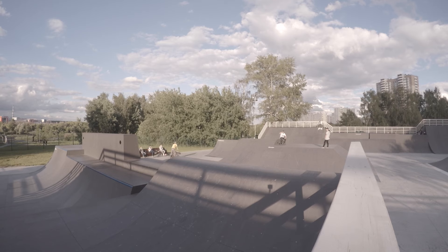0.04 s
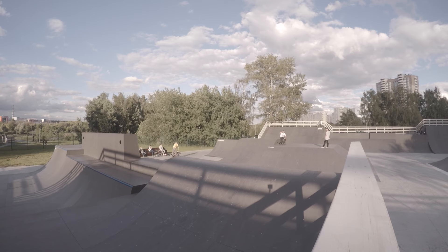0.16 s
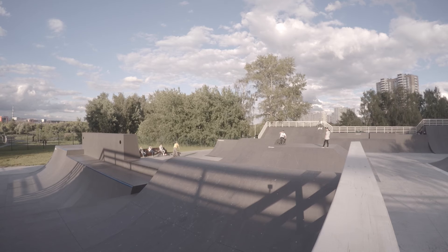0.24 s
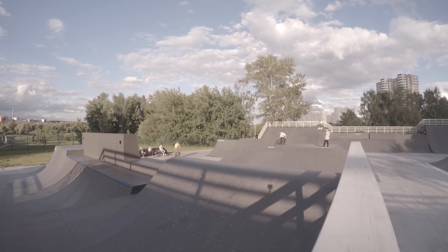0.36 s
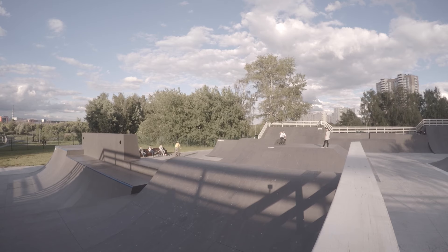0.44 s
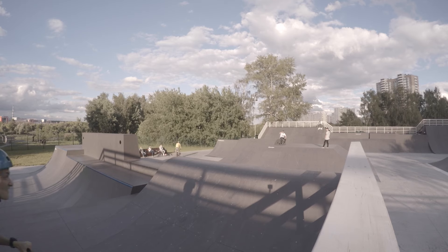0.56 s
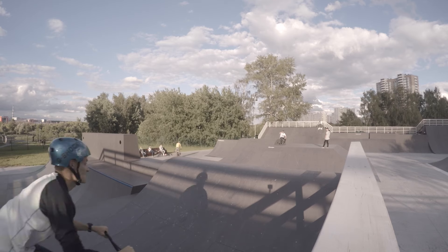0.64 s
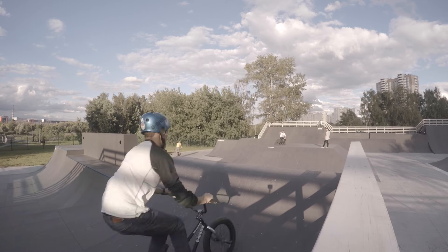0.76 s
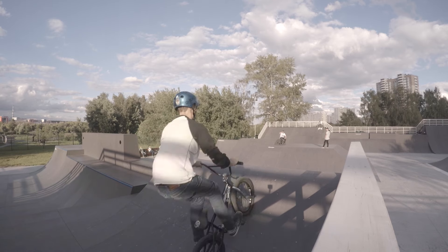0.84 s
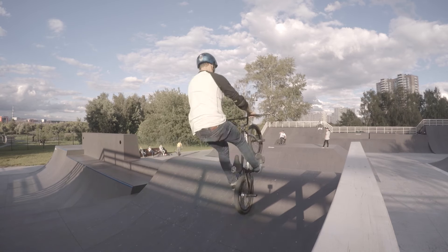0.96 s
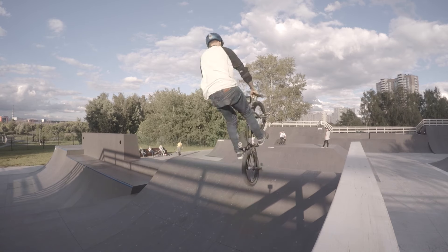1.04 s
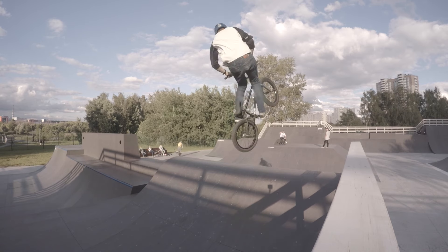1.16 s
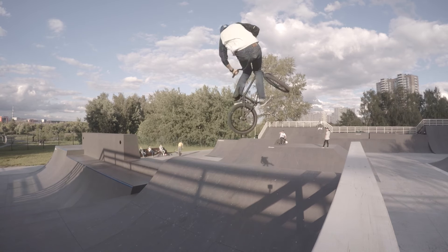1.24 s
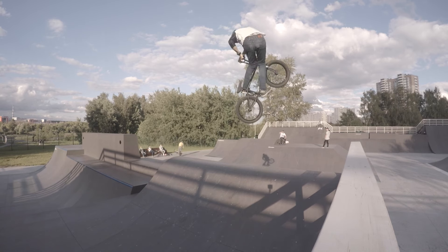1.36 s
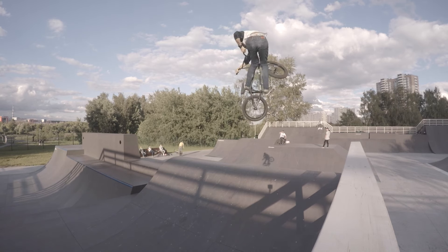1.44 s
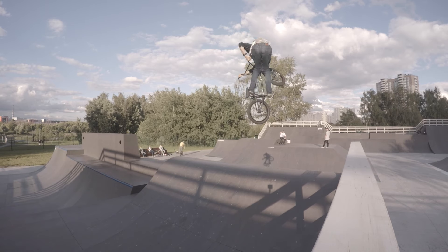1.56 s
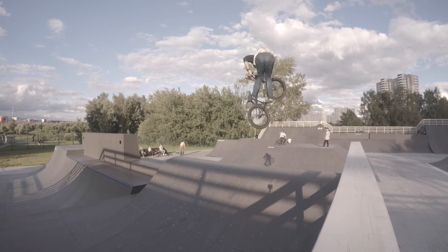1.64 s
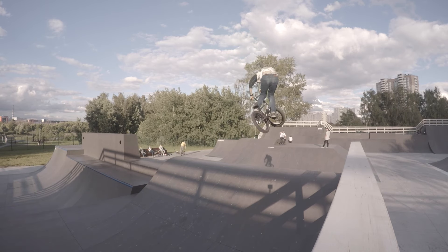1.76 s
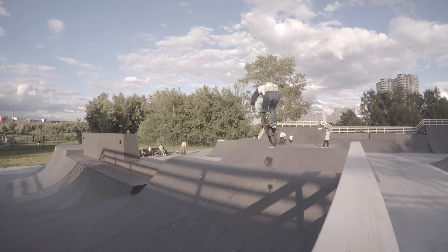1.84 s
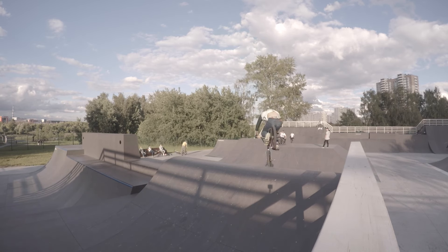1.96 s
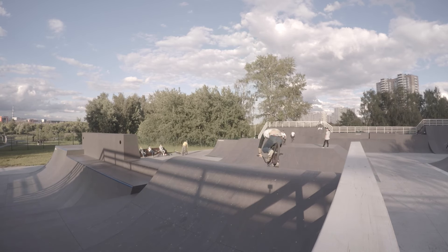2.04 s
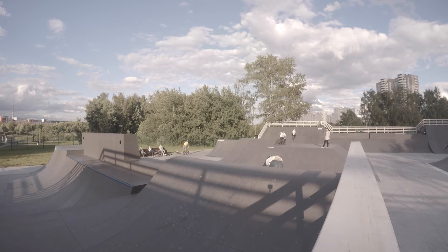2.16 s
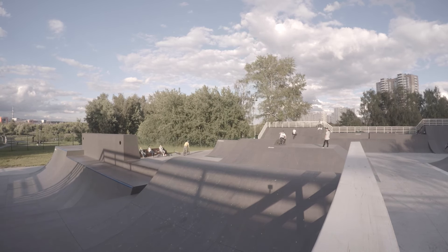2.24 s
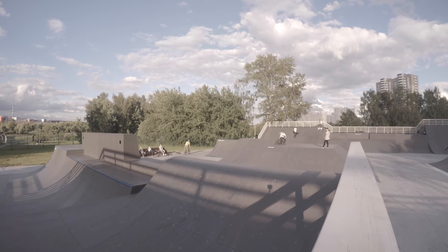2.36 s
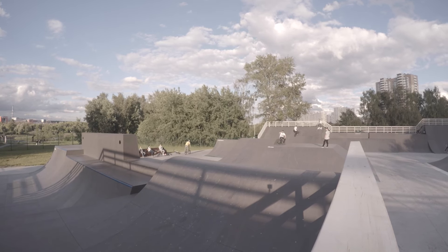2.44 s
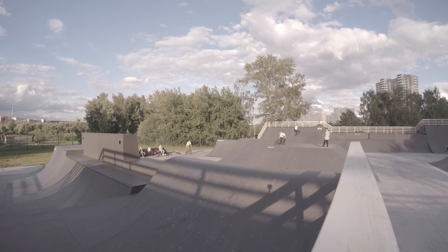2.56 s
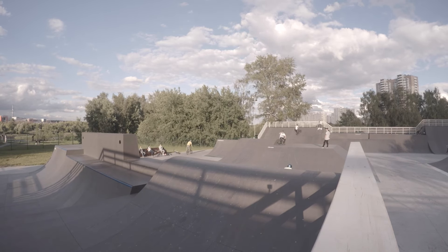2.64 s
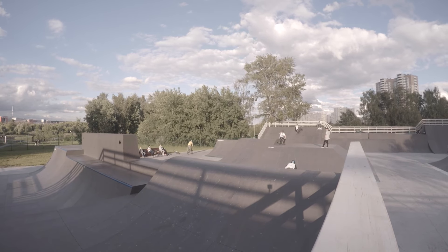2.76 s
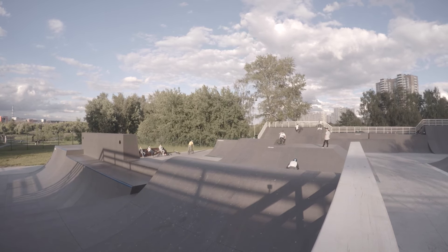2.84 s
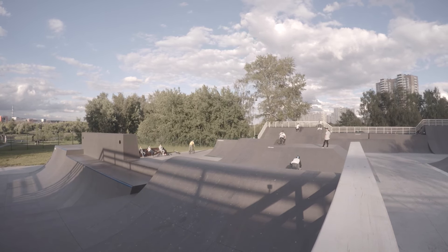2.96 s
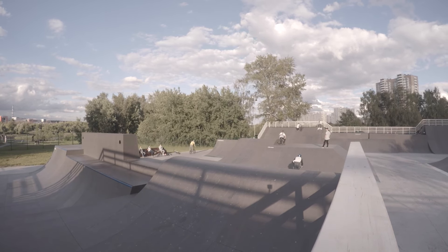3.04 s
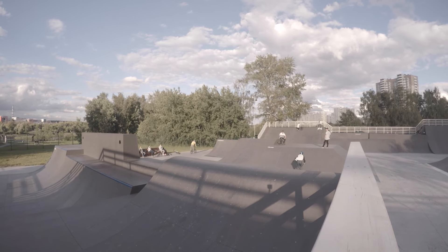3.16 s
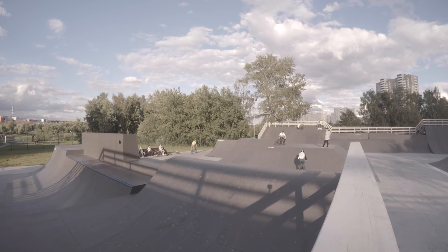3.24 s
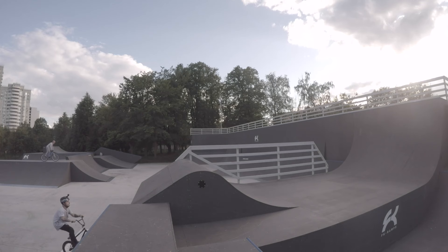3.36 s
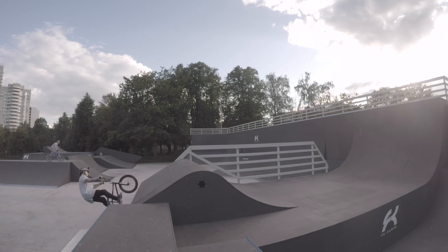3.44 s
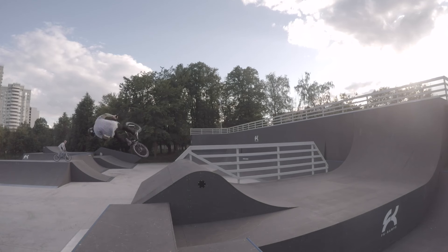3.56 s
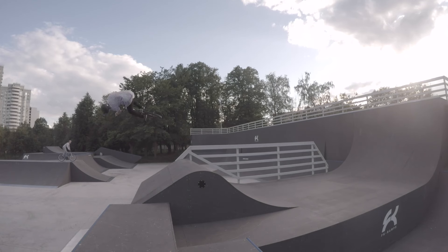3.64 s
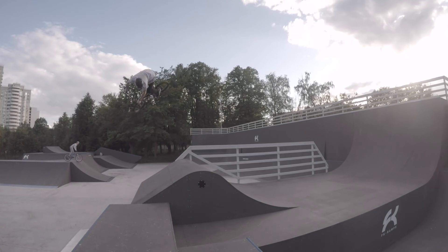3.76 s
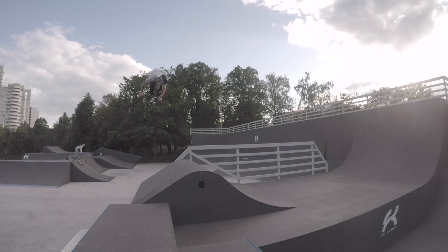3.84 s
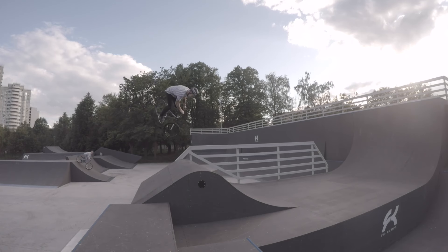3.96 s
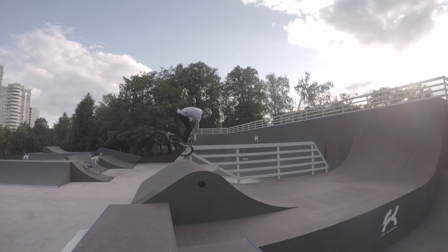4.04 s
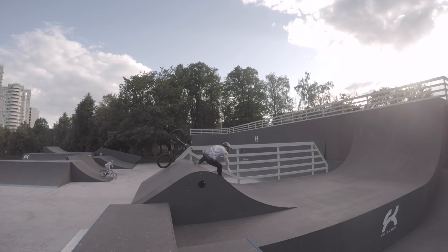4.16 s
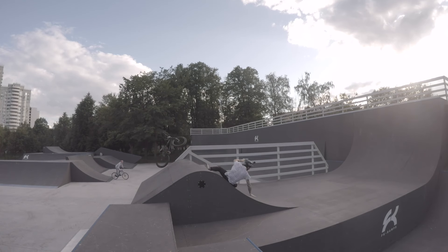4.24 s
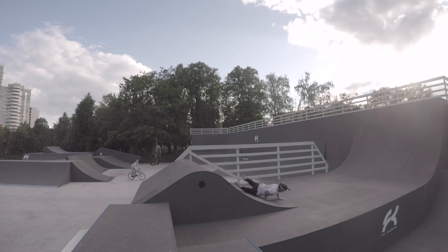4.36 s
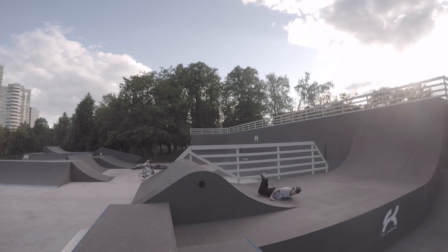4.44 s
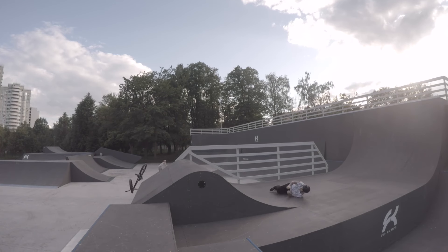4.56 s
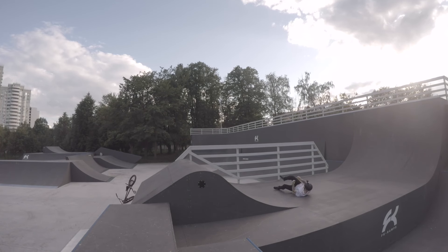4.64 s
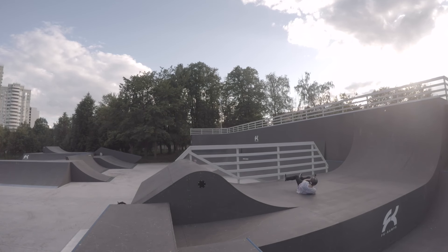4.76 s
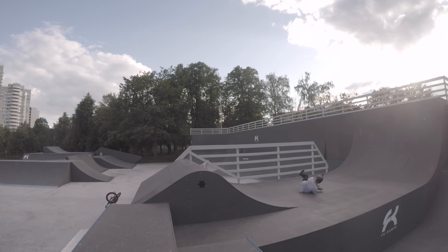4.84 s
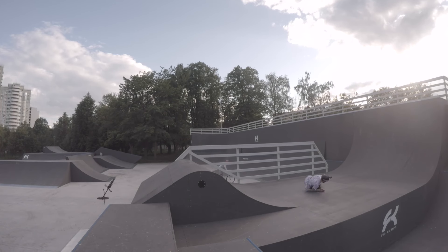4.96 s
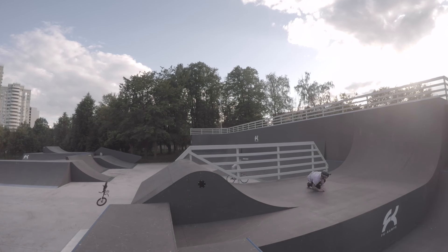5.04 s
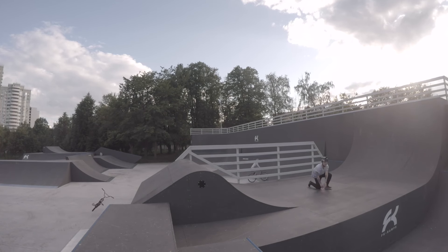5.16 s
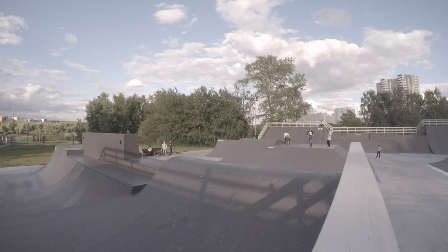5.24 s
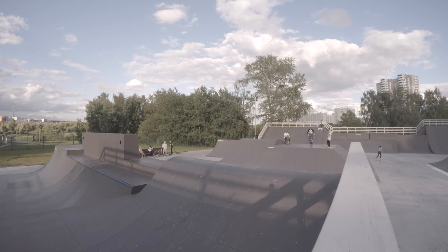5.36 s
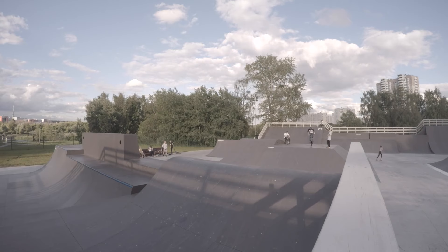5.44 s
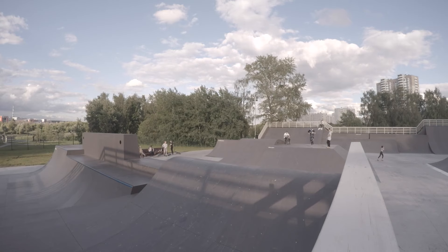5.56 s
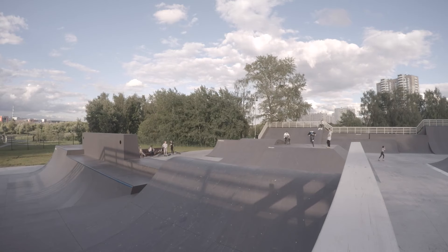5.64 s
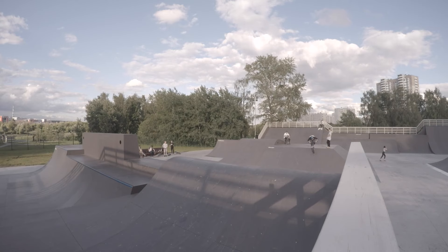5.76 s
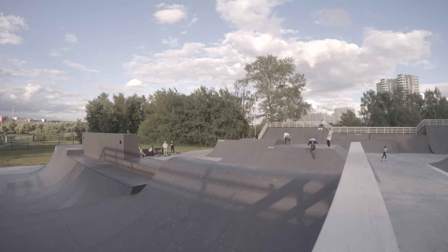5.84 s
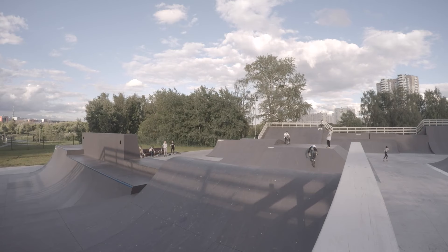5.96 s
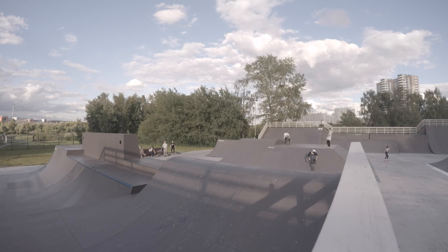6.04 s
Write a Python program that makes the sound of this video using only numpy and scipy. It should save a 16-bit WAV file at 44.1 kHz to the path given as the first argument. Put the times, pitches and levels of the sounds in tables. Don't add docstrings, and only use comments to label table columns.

```python
import sys
import numpy as np
from scipy import signal
from scipy.fft import rfft, irfft, next_fast_len
from scipy.io import wavfile
from scipy.ndimage import uniform_filter1d, map_coordinates

SR = 44100
rng = np.random.default_rng(int(sys.argv[2]) if len(sys.argv) > 2 else 0)


def persist_wave(psi):
    counts = np.round(np.clip(psi, -1, 1) * 32767).astype(np.int16)
    wavfile.write(sys.argv[1], SR, np.atleast_2d(counts).T)


def how_loud(loudness_db):
    steps = np.asarray(loudness_db, float) / 20
    return 10 ** steps


N = 269010

# (time [s], time [s])
SCENE_CHANGES = (3.437, 5.32)


def clock():
    return np.arange(N) / SR


def white():
    return rng.standard_normal(N)


def unit(x):
    return x / np.sqrt(np.mean(x ** 2) + 1e-20)


def curves(rows):
    s, *cols = np.transpose(rows)
    t = clock()
    gate = (t >= s[0]) * np.clip((s[-1] - t) / 0.0022, 0, 1)
    return [np.interp(t, s, c) for c in cols] + [gate]


def wobble(rate):
    knots = rng.standard_normal(int(N * rate / SR) + 4)
    return map_coordinates(knots, [np.arange(N) * rate / SR])


def swell(s, db, t60, rise):
    since = np.clip(clock() - s, 0, None)
    return how_loud(db - 60 * since / t60) * (1 - np.exp(-since / rise))


def touches(rows):
    t = clock()
    return sum(how_loud(db) * np.exp(-((t - s) / half) ** 2) for s, half, db in rows)


def filtered(x, response):
    m = next_fast_len(N + SR // 2)
    return irfft(rfft(x, m) * response(np.fft.rfftfreq(m, 1 / SR)), m)[:N]


def coloured(x, spectrum):
    f, db = np.transpose(spectrum)
    return unit(filtered(x, lambda hz: how_loud(np.interp(np.log(hz + 1), np.log(f + 1), db))))


def resonant(x, modes, steep=1.42):
    def response(f):
        g = 0
        for k, (c, w, db) in enumerate(modes):
            g = g + (-1) ** k * how_loud(db / steep) * 1j * f * w / (c * c - f * f + 1j * f * w)
        g = g * np.abs(g) ** (steep - 1)
        return g / np.sqrt(np.mean(np.abs(g) ** 2))
    return filtered(x, response)


def rush(spectrum, patchy_db, grain_db=0, grain_hz=300):
    z = signal.stft(white() * how_loud(grain_db * wobble(grain_hz)), nperseg=512)[2]
    field = uniform_filter1d(rng.standard_normal(z.shape), 6, 0)
    field = uniform_filter1d(field, 10, 1)
    patchy = signal.istft(z * how_loud(patchy_db * unit(field)), nperseg=512)[1][:N]
    return coloured(patchy, spectrum)


def bursts(times, db, t60, rise=0.0013):
    t = np.arange(SR // 8) / SR
    shape = how_loud(np.c_[db] - 60 * t / np.clip(np.c_[t60], .003, .2)) * (1 - np.exp(-t / rise))
    at = np.round(np.c_[times] * SR).astype(int) + np.arange(len(t))
    return np.bincount(at.ravel(), shape.ravel(), N + SR)[:N] * white()


def passing():
    # (time [s], level [dB])
    nearness = [(0.0, -54), (0.34, -47.5), (0.6, -44), (0.81, -39), (0.96, -40.5), (1.05, -48.5),
                (1.13, -61), (2.04, -66), (2.2, -65)]
    tyre_db, gate = curves(nearness)
    return gate * (tyres(tyre_db) + hub_buzz()) + tread_hum() + wheel_leaving()


def tyres(tyre_db):
    # (frequency [Hz], level [dB per Hz])
    deck_colour = [(88, -12), (150, 4), (216, 0.5), (315, -5.5), (450, -9), (631, -6), (710, -2.5),
                   (1600, -18), (2080, -19.5), (3520, -120)]
    # (frequency [Hz], level [dB per Hz])
    hiss_colour = [(760, -18), (1300, -30), (1460, -23), (2330, -1), (2690, -3.5), (3100, 3), (3510, -1.5),
                   (3900, 6.5), (4450, 1), (5200, -9), (5710, -14.5), (7000, -18), (9100, -52),
                   (15400, -120)]
    earlier_boom = how_loud(-32 - 60 * clock() / 1.17)
    deck = (how_loud(tyre_db + 4) + earlier_boom) * rush(deck_colour, patchy_db=-1.0)
    return deck + how_loud(tyre_db) * rush(hiss_colour, patchy_db=2.5, grain_db=1.0)


def hub_buzz():
    # (frequency [Hz], level [dB per Hz])
    beside = [(2940, -52), (5000, -9), (5930, -10), (6760, -19), (7600, 1), (8500, -0.5), (11500, -10),
              (12900, -5), (15200, -6), (16000, -12)]
    # (frequency [Hz], level [dB per Hz])
    arriving = [(2940, -36), (5000, -3.5), (7040, -4.5), (7560, -3), (8820, 2), (10200, -11), (14500, -7),
                (15800, -9)]
    # (frequency [Hz], level [dB per Hz])
    departing = [(3290, -30), (5600, 2), (5670, -12), (7230, -4), (7590, -6), (8170, -6), (15800, -15)]
    # (time [s], half length [s], level [dB])
    spring_rings = [
        (.36, .07, -8),
        (.45, .015, -10),
        (.95, .012, -5),
        (1.869, .04, -4),
    ]
    t = clock()
    takeoff_s, lift_s = 1, 0.12
    hub_db = -48.5 - 4.5 * t - 13.5 * np.clip((t - takeoff_s) / lift_s, 0, 1)
    teeth = np.cumsum(125 + 12 * wobble(12)) / SR % 1
    pawls = white() * (0.27 + np.exp(-teeth / 0.25)) * how_loud(0.8 * wobble(39.7))
    come, gone = ((1 + np.tanh((t - s) / .05)) / 2 for s in (0.2, 0.79))
    buzz = (come - gone) * coloured(pawls, beside)
    buzz += (1 - come) * how_loud(0.5) * coloured(pawls, arriving)
    buzz += gone * how_loud(0.5) * coloured(pawls, departing)
    buzz += how_loud(1.5 * wobble(5.5)) * touches(spring_rings) * resonant(white(), [(13000, 250, 0)])
    return how_loud(hub_db) * buzz


def tread_hum():
    # (time [s], knob rate [Hz], level [dB], overtone level [dB])
    knobs = [(.33, 250.5, -55, -55), (.4, 256.3, -42, -50), (.52, 244, -48, -49), (.62, 249.6, -57, -46),
             (.68, 258.6, -32, -47), (.718, 265, -38, -47), (.735, 305.6, -37, -56), (.82, 318, -39, -46),
             (.96, 331.5, -40, -47), (1.02, 332.4, -63, -62)]
    knob_hz, hum_db, over_db, _ = curves(knobs)
    turn = 2 * np.pi * np.cumsum(knob_hz * (1 + 0.0143 * wobble(40))) / SR
    second = how_loud(over_db + 2.5) + how_loud(-38 - 4000 * (clock() - .85) ** 2)
    hum = how_loud(hum_db + 1.7 * wobble(25.06)) * np.sin(turn) + second * np.sin(2 * turn)
    hum += how_loud(over_db - 0.5 + 2.9 * wobble(20.0)) * np.sin(3 * turn)
    return hum + how_loud(over_db - 7.5 + 2.7 * wobble(16)) * np.sin(4 * turn)


def wheel_leaving():
    # (frequency [Hz], width [Hz], level [dB])
    edge_modes = [(1930, 250, -4), (2580, 760, 0)]
    fade = how_loud(-47) / (1 + (clock() / 0.17) ** 6)
    return fade * unit(resonant(white(), edge_modes))


def freewheel():
    # (time [s], teeth passed [count])
    coasting = [(1.06, 0), (1.169, 3), (1.292, 8), (1.4404, 17), (1.5567, 23), (1.779, 39), (1.8939, 47),
                (2.05, 57)]
    # (level at take-off [dB], fade [dB per s], swing [dB], faces the microphone at [s])
    facing = [
        (-50, 7.5, 3, 1.285),
        (-55.5, 6, 2, 1.47),
        (-45.5, 9, -1.5, 1.45),
    ]
    # (frequency [Hz], width [Hz], level [dB])
    pawl_modes = [(7500, 710, 3), (10200, 1100, -3)]
    # (frequency [Hz], width [Hz], level [dB])
    spring_modes = [(12500, 770, 2), (13700, 700, -8)]
    # (frequency [Hz], width [Hz], level [dB])
    shell_modes = [(2400, 400, -6), (3250, 300, 0.5), (3680, 320, 4), (4490, 160, 8), (5250, 440, -3)]
    turn_s = 0.49
    when, teeth = np.transpose(coasting)
    s = np.interp(np.arange(teeth[-1] + 1), teeth, when)
    luck = rng.standard_normal((len(s), 4))
    s = s + 0.00077 * luck[:, 0]
    levels = []
    for k, (db, fade_db, swing_db, at) in enumerate(facing):
        swing = swing_db * np.cos(2 * np.pi * (s - at) / turn_s)
        levels.append(db - fade_db * (s - s[0]) + swing + 2.0 * luck[:, k + 1])
    pawl_db, spring_db, shell_db = levels
    pawl = resonant(bursts(s, pawl_db - 0.5, 0.013 + 0 * s, rise=0.00033), pawl_modes)
    spring = resonant(bursts(s, spring_db + 1, 0.011 + 0 * s, rise=.0003), spring_modes)
    shell = resonant(bursts(s + 0.0009, shell_db + 2, 0.022 + 0 * s, rise=0.00078), shell_modes, steep=1.5)
    return pawl + spring + shell


def chain():
    # (time [s], peak level [dB], link level [dB])
    slaps = [(2.2326, -33, -16), (2.2482, -19, -14.5), (2.2608, -23, -26), (2.271, -14, -20),
             (2.2748, -16, -26), (2.2815, -10.5, -27), (2.2965, -23.5, -23), (2.309, -28, -15),
             (2.331, -29, -20), (2.337, -31, -21), (2.3455, -28, -20), (2.3614, -45, -13),
             (2.378, -34, -11), (2.3873, -33, -17), (2.39, -25, -20), (2.4135, -30, -14),
             (2.4214, -36, -14), (2.4314, -37, -12), (2.441, -31.5, -12), (2.462, -31, -12),
             (2.475, -34, -15), (2.4833, -28, -18), (2.51, -32.5, -14), (2.522, -31, -16),
             (2.5526, -30, -16), (2.569, -33, -16), (2.593, -34, -13), (2.6044, -36.5, -13.5),
             (2.6314, -33, -14), (2.6525, -35.5, -16), (2.6748, -42, -13), (2.684, -34, -15),
             (2.693, -41, -12), (2.7212, -34, -18), (2.756, -36.5, -16), (2.7654, -40, -16),
             (2.795, -34, -16), (2.8379, -44, -10), (2.8499, -42, -10), (2.8858, -40, -16),
             (2.917, -47, -9)]
    # (time [s], level [dB], t60 [s])
    rattle = [
        (2.255, -30, .2),
        (2.38, -48, 1.1),
    ]
    # (frequency [Hz], width [Hz], level [dB])
    stay_modes = [(904, 616, 5), (1430, 820, 4.5), (1880, 530, 5.5), (2376, 850, -1), (2750, 430, -0.5)]
    # (frequency [Hz], width [Hz], level [dB])
    link_modes = [(3560, 380, 0), (4770, 680, 6.5), (6450, 500, -1.5), (7200, 250, -2)]
    s, db, link_db = np.transpose(slaps)
    t60 = 0.036 * how_loud(1.5 * rng.standard_normal(len(s)))
    clusters = how_loud(2.5 * wobble(250))
    stay = resonant(clusters * bursts(s, db - 0.5, t60, rise=0.0015), stay_modes, steep=1.43)
    links = resonant(clusters * bursts(s, db + link_db - 1.5, t60 * 0.9, rise=0.002), link_modes, steep=2.2)
    chatter = sum(swell(*row, rise=.015) for row in rattle) * how_loud(4.5 * wobble(120)) * white()
    stay += resonant(chatter, stay_modes, steep=1.43)
    return stay + links + how_loud(-15) * resonant(chatter, link_modes, steep=1.6)


def ramp():
    # (time [s], load [dB])
    load = [(3.44, -29), (3.57, -30), (3.79, -25.5), (4.146, -30.5), (4.23, -32), (4.702, -26.5),
            (5.14, -27.5), (5.32, -27.5)]
    # (frequency [Hz], level [dB per Hz])
    rumble_colour = [(88, -5.5), (150, -8), (326, -5), (404, -4.5), (515, -6.5), (609, -2), (742, -8),
                     (814, -2), (1400, -22), (1820, -66), (3080, -120)]
    # (frequency [Hz], level [dB per Hz])
    scrape_colour = [(650, -12), (1100, 1), (1360, -22), (1470, -1), (1560, -5), (1980, -9.5),
                     (3400, -33.5), (4420, -53), (7480, -120)]
    # (frequency [Hz], level [dB per Hz])
    grit_colour = [(1650, -7), (2800, -1), (3570, -7), (3890, -1.5), (4180, -4), (5370, -8), (11200, -30.5),
                   (12600, -23), (15500, -29)]
    # (time [s], half length [s], level [dB])
    slides = [(3.618, 0.33, -58.5), (4.224, 0.18, -56), (4.925, 0.04, -49), (4.99, .025, -56),
              (4.865, .012, -50), (4.44, .03, -58), (4.6, .04, -60), (5.075, 0.073, -65)]
    # (time [s], level [dB], t60 [s])
    slam = (4.163, -13, 0.1)
    load_db, gate = curves(load)
    judder = wobble(35)
    shaking = how_loud(load_db + 0.2 * judder) + swell(*slam, rise=0.0037)
    rumble = shaking * rush(rumble_colour, patchy_db=2.0, grain_db=0.87, grain_hz=125.3)
    scrape_db = -49.5 + 1.95 * (load_db + 30.5)
    scrape = how_loud(scrape_db + 0.79 * judder) * rush(scrape_colour, patchy_db=0.5, grain_db=2.5)
    grit = (how_loud(-65.5) + touches(slides)) * how_loud(0.33 * judder)
    return gate * (rumble + scrape + grit * rush(grit_colour, patchy_db=0.8, grain_db=2.5))


def knocks():
    # (time [s], panel level [dB], frame level [dB], pedal level [dB])
    close_blows = [(3.437, -17.5, -45, -45), (4.145, -24, -42, -40), (4.149, -22, -40, -38),
                   (4.153, -24, -42, -40), (4.162, -22, -16.5, -28), (4.166, 2, -16.5, -31),
                   (4.196, -24, -40, -53), (4.226, -25, -47, -47), (4.248, -29, -44, -54),
                   (4.301, -27, -36, -49), (4.325, -32, -37, -47), (4.411, -11, -35, -31),
                   (4.49, -14, -41, -64), (4.532, -28, -43, -55), (4.546, -27, -42, -52),
                   (4.569, -23, -33, -58), (4.578, -10.5, -38, -26.5), (4.589, -3.5, -25.5, -48),
                   (4.624, -13, -30.5, -49), (4.809, -27, -42, -52), (4.813, -14.5, -24, -36),
                   (4.818, -33, -24, -29), (4.822, -20, -28, -23), (4.827, -10, -26, -22),
                   (4.833, -16, -28, -34), (4.859, -14, -27, -40), (4.885, -30, -38, -46),
                   (4.905, -31, -40, -48), (5.215, -26, -48, -50), (5.236, -38, -42, -41),
                   (5.285, -18, -32, -43), (5.302, -26, -46, -46), (5.31, -28, -48, -47),
                   (5.316, -28, -46, -46)]
    # (time [s], panel level [dB], frame level [dB], coping level [dB])
    far_blows = [(3.265, -25, -39, -39.5), (3.284, -21, -49, -49), (3.31, -27, -54, -50),
                 (3.364, -20, -37.5, -36.5), (3.372, -32, -47, -50), (3.385, -21, -46, -49),
                 (3.409, -22, -50, -46), (3.439, -28, -50, -42), (3.454, -15.5, -53, -38)]
    # (time [s], level [dB])
    steel_cracks = [(4.162, -42), (4.166, -35), (4.302, -48), (4.412, -46), (4.812, -56), (4.823, -42),
                    (5.284, -52)]
    # (frequency [Hz], width [Hz], level [dB])
    panel_modes = [(300, 234, 0.5), (496, 140, 4), (800, 207, 1), (1074, 276, -5.5)]
    # (frequency [Hz], width [Hz], level [dB])
    frame_modes = [(1330, 310, -3), (1940, 350, -1), (2320, 170, 2), (2950, 780, -9)]
    # (frequency [Hz], width [Hz], level [dB])
    pedal_modes = [(3700, 1180, 2), (4520, 1010, 0.5), (5270, 290, -4)]
    # (frequency [Hz], width [Hz], level [dB])
    coping_modes = [(4270, 590, 0.5), (5510, 480, -3)]
    # (frequency [Hz], width [Hz], level [dB])
    crack_modes = [(7100, 2600, 6), (12200, 4600, -21)]
    s, panel_db, frame_db, high_db = np.transpose(close_blows + far_blows)
    ring_s, near = 0.023, len(close_blows)
    t60 = ring_s + 0 * s

    def ping(k, modes):
        return resonant(bursts(s[k], high_db[k] + 5.0, t60[k] * 0.55, rise=0.00065), modes, steep=1.45)

    wood = resonant(bursts(s, panel_db - 3.0, t60 * 1.24, rise=0.0014), panel_modes)
    steel = resonant(bursts(s, frame_db + 2.5, t60), frame_modes, steep=1.0)
    steel = steel + ping(slice(near), pedal_modes) + ping(slice(near, None), coping_modes)
    at, crack_db = np.transpose(steel_cracks)
    at, crack_db = np.r_[s, at], np.r_[(frame_db + high_db) / 2 - 37, crack_db]
    return wood + steel + resonant(bursts(at, crack_db + 1.0, ring_s * 0.57 + 0 * at, rise=.0002), crack_modes)


def thuds():
    # (time [s], level [dB], frequency [Hz], t60 [s])
    ringing_blows = [(2.23, -10, 95.3, 0.06), (2.475, -7, 50, 0.15), (3.266, -28, 290, 0.22),
                     (3.366, -31.5, 300, 0.34), (3.494, -8.5, 47, 0.18), (3.776, -12, 800, 0.021),
                     (3.805, -11, 700, 0.025), (3.846, -10.5, 810, 0.025), (3.884, -17, 854, 0.031),
                     (4.171, -2.5, 110.7, 0.055), (4.172, -8, 805, 0.035), (4.193, -1, 58, 0.074),
                     (4.304, -10, 68.6, 0.078), (4.33, -3, 111, 0.049), (4.418, -5, 78.6, 0.12),
                     (2.236, -15, 149, 0.27), (2.55, -27.5, 171, .3), (1.447, -45, 2035, 0.023),
                     (1.86, -48, 2296, 0.032), (1.885, -47, 2500, .03), (2.045, -51, 2400, 0.045),
                     (2.147, -57, 3680, .05), (4.427, -0.5, 33.5, 0.17), (4.491, -17, 840, .025),
                     (4.492, -21.5, 1430, 0.017), (4.553, -29, 1380, .02), (4.432, -15, 840, 0.023),
                     (4.452, -21, 1000, .02), (4.59, -10, 720, 0.036), (4.587, -28, 2900, 0.017),
                     (4.471, -15, 910, 0.02), (4.588, -12.5, 120, 0.076), (4.167, -11, 2400, 0.022),
                     (4.827, -20, 2290, 0.04), (4.827, -23, 3680, 0.022), (4.821, -27, 4500, 0.015),
                     (.55, -16.5, 212, 0.066), (0.553, -25.5, 330, 0.068), (.605, -17.5, 106, 0.058),
                     (4.196, -10, 260, 0.042), (4.325, -19, 242, .06), (5.128, -16, 660, 0.05),
                     (5.148, -15, 730, 0.029), (4.822, -14, 840, 0.078), (4.826, -12, 505, 0.087),
                     (2.2395, -6, 70, .3),
        (2.274, -5, 58, .2),
        (2.334, -4, 46, .12),
        (3.785, -16, 60, .08),
        (4.452, -9, 38, .15),
        (4.632, -12, 48, .12),
                     (2.635, -33, 1150, .06), (2.655, -33, 1150, .06), (2.721, -33, 1160, .06),
                  (2.799, -33, 1150, .07), (2.417, -29, 1060, .06), (2.485, -32, 1100, .06),
                  (3.762, -20, 690, .03), (3.81, -15, 720, .025), (3.828, -20, 800, .025),
                  (3.862, -19, 620, .03), (3.903, -22, 760, .03)]
    out = np.zeros(N + SR)
    t = np.arange(SR // 3) / SR
    for s, db, hz, t60 in ringing_blows:
        cycles = hz * t
        gain = how_loud(db - 60 * t / t60) * (1 - np.exp(-cycles / 0.19))
        out[round(s * SR):][:len(t)] += gain * np.sin(2 * np.pi * cycles * (1 - 0.44 * t))
    return out[:N]


def scuffs():
    # (time [s], level [dB], t60 [s])
    skids = [
        (4.434, -30, 0.03),
        (4.439, -41, 0.025),
        (4.444, -50, .02),
    ]
    # (time [s], level [dB])
    spoke_ticks = [(4.4125, -43), (4.578, -54), (4.163, -50)]
    rubber_modes = [(9000, 1600, 2), (10600, 1500, 9), (13800, 1800, -24)]  # (Hz, width Hz, dB)
    skid = resonant(bursts(*np.transpose(skids), rise=0.0018), rubber_modes, steep=2.0)
    s, db = np.transpose(spoke_ticks)
    return skid + resonant(bursts(s, db, .006 + 0 * s, rise=.0003), [(10300, 2500, 0), (13500, 3000, -3)])


def brushing():
    # (time [s], level [dB], t60 [s])
    grinds = [(3.265, -51, .18), (3.365, -47, 0.25), (3.44, -45, 0.1), (5.238, -52, .2), (4.59, -48, .12),
              (4.413, -52, .1)]
    # (frequency [Hz], width [Hz], level [dB])
    peg_modes = [(2100, 900, -2), (4370, 980, -3), (5380, 600, -4)]
    # (time [s], half length [s], level [dB])
    strokes = [(3.58, .12, -68.5), (3.683, 0.021, -61), (4.445, 0.012, -58), (4.104, 0.063, -62),
               (4.327, 0.0089, -54), (4.925, 0.025, -63), (5.072, 0.057, -63)]
    # (frequency [Hz], level [dB per Hz])
    cloth_colour = [(3500, -30), (5500, -3), (7500, 2), (10000, -4), (14000, -15), (16000, -11)]
    stutter = white() * how_loud(2.5 * wobble(150))
    grind = sum(swell(*row, rise=0.0036) for row in grinds) * unit(resonant(stutter, peg_modes, steep=1.5))
    return grind + touches(strokes) * rush(cloth_colour, patchy_db=0.0, grain_db=1.2)


def squeaks():
    # (time [s], length [s], start frequency [Hz], end frequency [Hz], level [dB])
    chirps = [(3.137, 0.025, 2840, 2600, -50), (5.88, 0.023, 2440, 2350, -47),
              (5.97, 0.058, 1890, 2030, -56), (5.91, .02, 2400, 2350, -62), (3, 0.019, 2800, 3200, -63),
              (5.1, 0.063, 850, 960, -23.5), (.668, 0.04, 3110, 3050, -45), (.795, .05, 3300, 3150, -46),
              (4.443, 0.018, 4000, 3950, -54), (4.587, 0.013, 3960, 3940, -44),
              (4.777, .012, 3850, 3800, -55), (5.092, .025, 2950, 3100, -55)]
    # (time [s], length [s], start frequency [Hz], end frequency [Hz],
    # level [dB])
    drones = [
        (.43, .135, 45.5, 48, -10),
        (5.889, .2, 36, 29, -10.5),
        (4.735, .085, 44, 40, -14),
    ]
    out = np.zeros(N)
    for s, length, start_hz, end_hz, db in chirps + drones:
        u = np.linspace(0, 1, round(length * SR))
        hz = start_hz + (end_hz - start_hz) * u
        gain = how_loud(db + 0.5) * np.abs(np.sin(np.pi * u)) ** 0.6
        out[round(s * SR):][:len(u)] += gain * np.sin(2 * np.pi * np.cumsum(hz) / SR)
    return out


def splices():
    # (time [s], level [dB], frequency [Hz], t60 [s])
    cut_rings = [
        (3.4384, -14, 92, 0.067),
    ]
    t = clock()
    return sum((t >= s) * how_loud(db - 60 * np.abs(t - s) / t60) * np.cos(2 * np.pi * hz * (t - s))
               for s, db, hz, t60 in cut_rings)


def park(x):
    # (delay [s], level [dB])
    walls = [
        (0.018, -26),
        (0.029, -18),
        (.046, -16),
    ]
    t = np.arange(SR // 4) / SR
    tail = how_loud(-39.5 - 60 * t / 0.29) * (t > .005)
    for delay, db in walls:
        tail = tail + how_loud(db - 45.0 - 60 * np.clip(t - delay, 0, 1) / 0.0055) * (t > delay)
    echo = signal.fftconvolve(x, tail * rng.standard_normal(len(t)))[:N]
    return x + filtered(echo, lambda hz: 1 / (1 + 1j * hz / 5000) ** 2)


def wind():
    # (time [s], strength [dB])
    gusts = [(0.0, -32.5), (0.08, -25), (0.39, -23), (0.51, -23), (0.63, -23.5), (0.95, -18), (1.31, -33.5),
             (2.17, -31), (2.4, -21.5), (3.06, -35), (3.53, -26), (4.06, -29.5), (4.25, -21), (4.67, -18),
             (5.01, -26.5), (5.83, -34), (5.91, -27), (6.1, -23)]
    # (frequency [Hz], level [dB per Hz])
    slow_colour = [(8.8, -21.5), (15, -2), (38, 0.5), (70, -4), (91, -27.5), (150, -120)]
    # (frequency [Hz], level [dB per Hz])
    flutter_colour = [(32, -37), (55, -3.5), (83, 4.5), (167, -12.5), (260, -17.5), (400, -25.5),
                      (570, -120)]
    # (time [s], level [dB], t60 [s])
    booms = [(0.491, -20, 0.3), (2.236, -17.5, 0.94), (3.489, -26, 0.24), (4.166, -8.5, 0.26),
             (4.29, -16.5, 0.66), (4.42, -17.5, 0.28), (4.59, -20, 0.56)]
    slow_db, _ = curves(gusts)
    slow = how_loud(slow_db) * rush(slow_colour, patchy_db=-1.0)
    calm_db, cap_db = -30, -26.5
    strength = how_loud(-38 + (np.minimum(slow_db, cap_db) - calm_db))
    strength = strength + sum(swell(*row, rise=0.0061) for row in booms)
    return slow + strength * unit(how_loud(2.3 * wobble(14)) * rush(flutter_colour, patchy_db=0.5))


def city():
    # (frequency [Hz], level [dB per Hz])
    city_colour = [(88, -47.5), (150, -16), (197, -17), (254, -7), (368, -8.5), (466, -4.5), (560, -8.5),
                   (821, -1), (1160, -5), (1330, -21.5), (1560, -23), (2950, -31), (4200, -27.5),
                   (7320, -36), (11000, -42.5), (16000, -47)]
    return how_loud(-45 + 0.15 * wobble(3.65)) * rush(city_colour, patchy_db=1.2)


def camera():
    # (frequency [Hz], start [share of a frame], length [share of a frame], level [dB])
    whines = [
        (10718, .575, .5, -71),
        (8925, .19, .11, -67),
    ]
    t = clock()
    frame_hz, fast_hz, late = 25, 50, .115
    fall_s, quiet_s = SCENE_CHANGES
    middle = (t > fall_s) & (t < quiet_s)
    rate = np.where(middle, fast_hz, frame_hz)
    frames = np.where(middle, (t - fall_s) * fast_hz - late, t * frame_hz)
    out = np.zeros(N)
    for hz, start, length, db in whines:
        since = (frames - start) % 1
        gate = uniform_filter1d((since < length) * 1., size=60)
        out += how_loud(db - 5 * middle) * gate * np.sin(2 * np.pi * hz * since / rate)
    return out


def scene():
    hits = park(freewheel() + chain() + knocks()) + thuds() + scuffs() + brushing()
    hits = hits * np.clip((SCENE_CHANGES[1] - clock()) / .003, 0, 1)
    return (passing() + hits + ramp() + squeaks() + wind() + city() + camera())[None]


def band_limit(x):
    return signal.sosfilt(signal.butter(12, 16480, fs=SR, output="sos"), x)


def record(dry):
    ceiling = .95
    mix = filtered(dry[0], lambda hz: hz < 15830)[None] + splices()
    mix = mix / (1 + np.abs(mix / ceiling) ** 8) ** (1 / 8)
    return band_limit(mix)


dry = scene()
out = record(dry)
persist_wave(out)
```